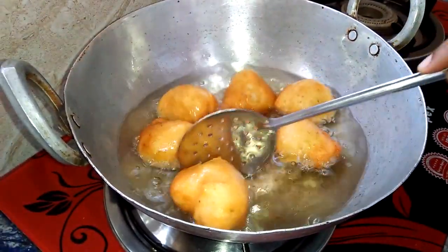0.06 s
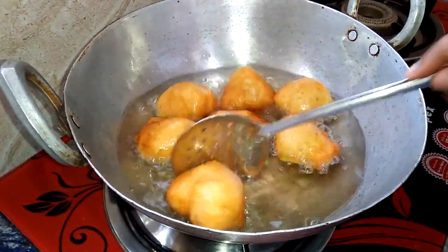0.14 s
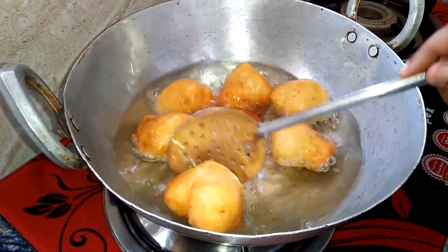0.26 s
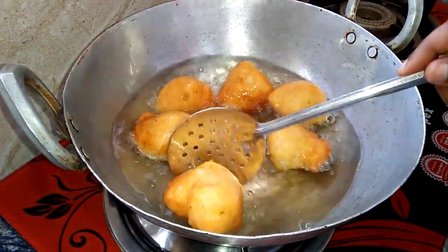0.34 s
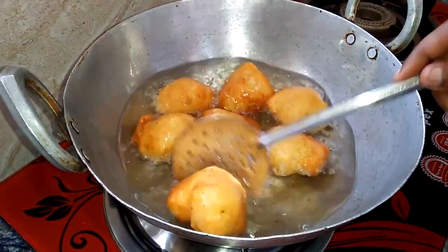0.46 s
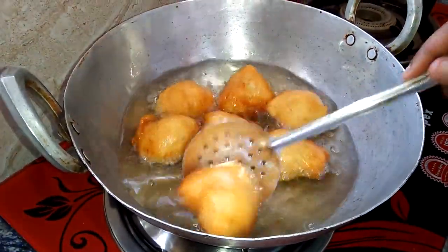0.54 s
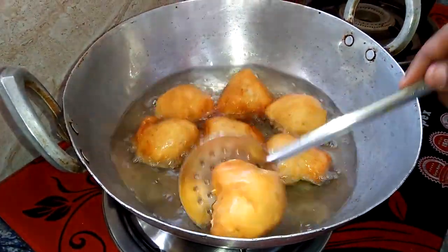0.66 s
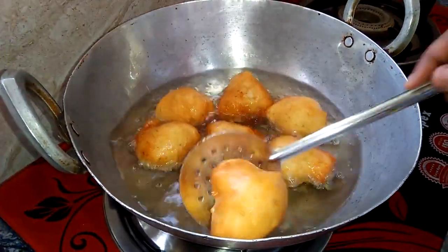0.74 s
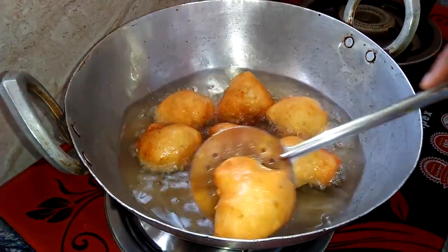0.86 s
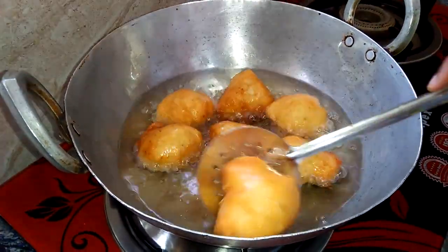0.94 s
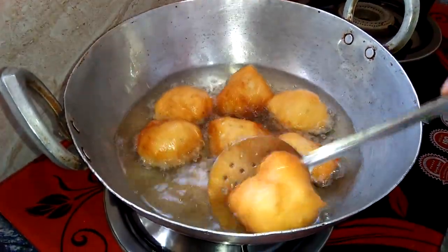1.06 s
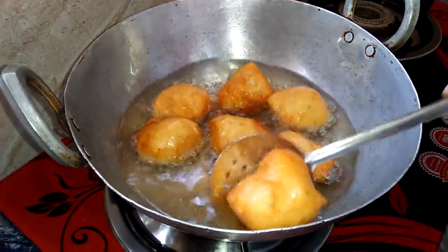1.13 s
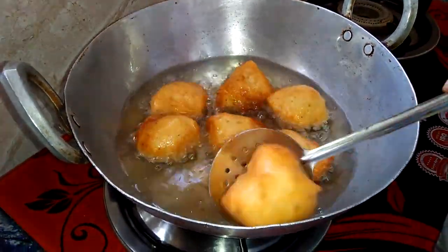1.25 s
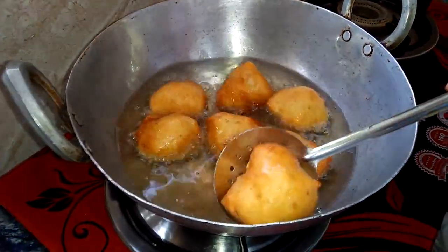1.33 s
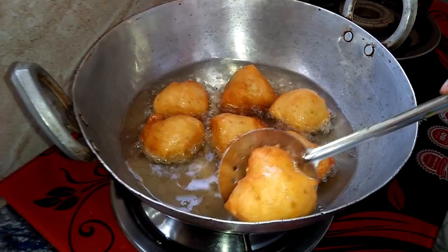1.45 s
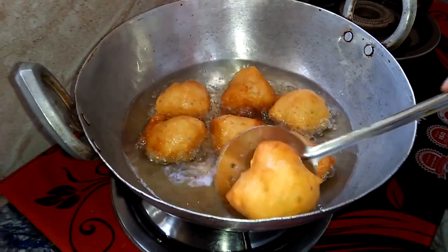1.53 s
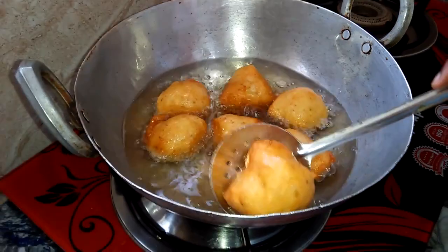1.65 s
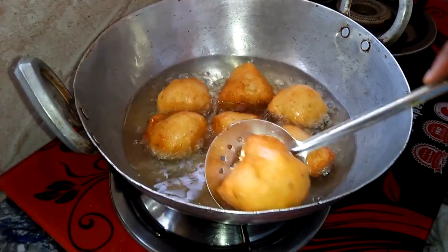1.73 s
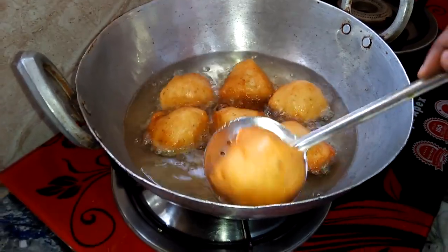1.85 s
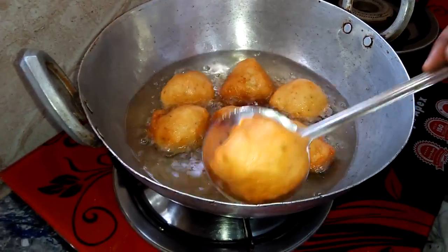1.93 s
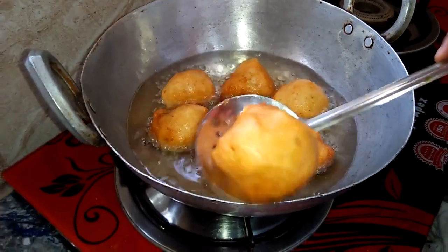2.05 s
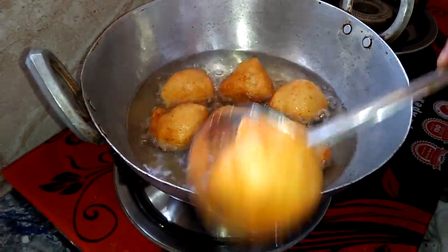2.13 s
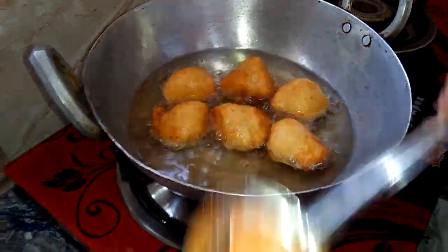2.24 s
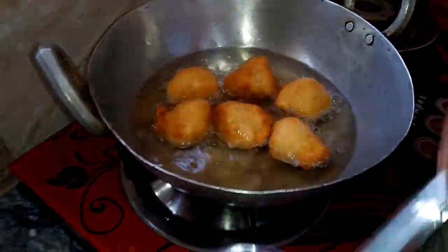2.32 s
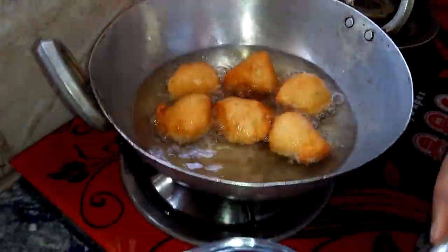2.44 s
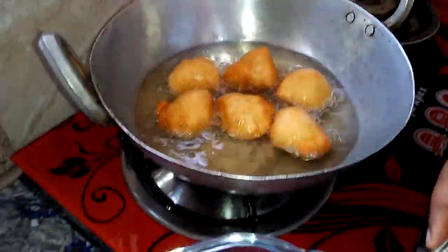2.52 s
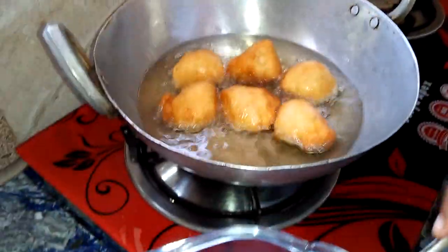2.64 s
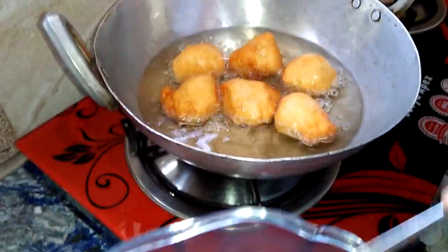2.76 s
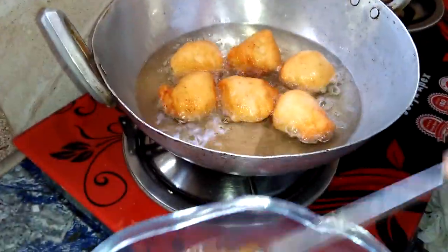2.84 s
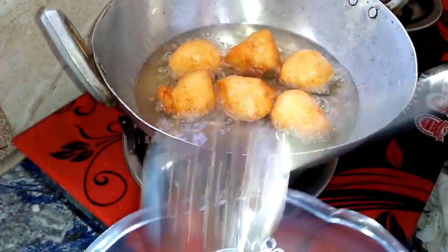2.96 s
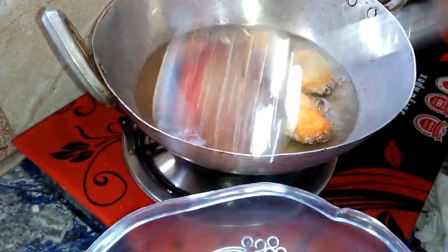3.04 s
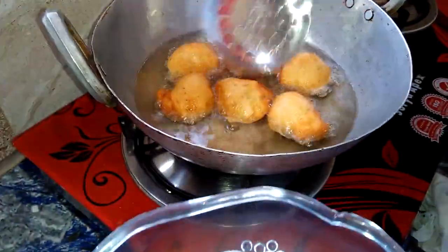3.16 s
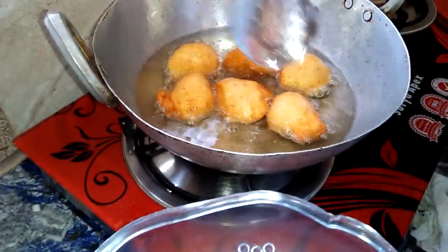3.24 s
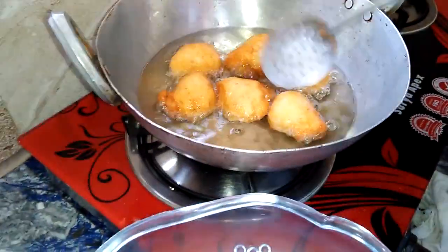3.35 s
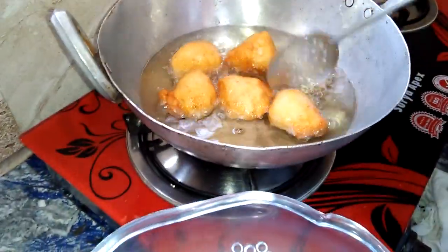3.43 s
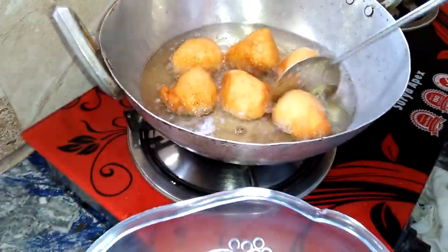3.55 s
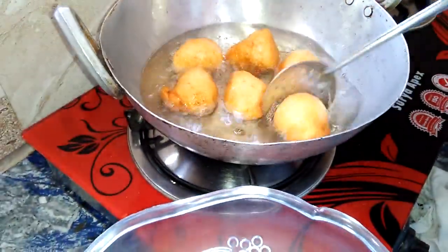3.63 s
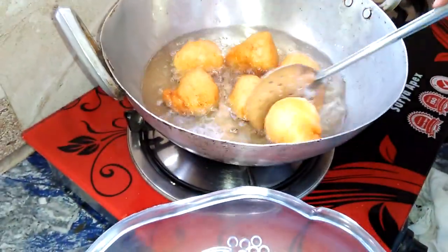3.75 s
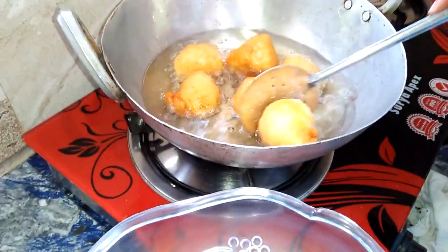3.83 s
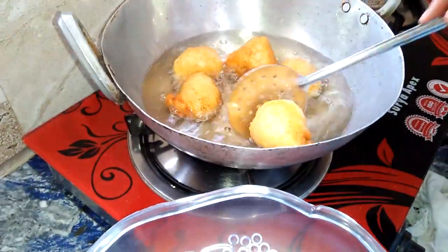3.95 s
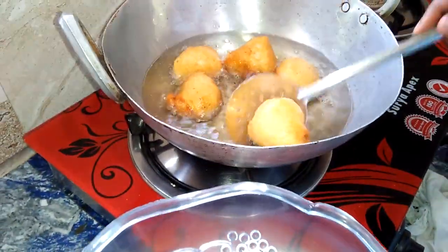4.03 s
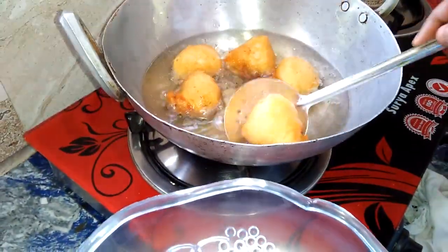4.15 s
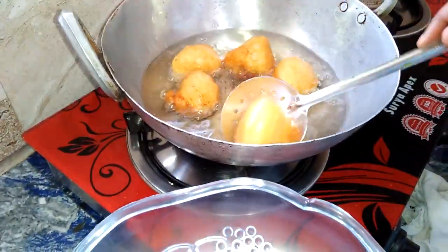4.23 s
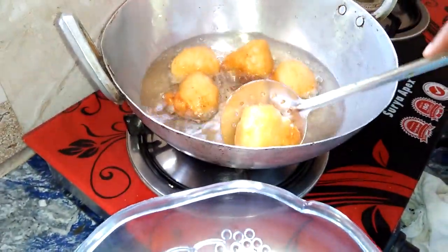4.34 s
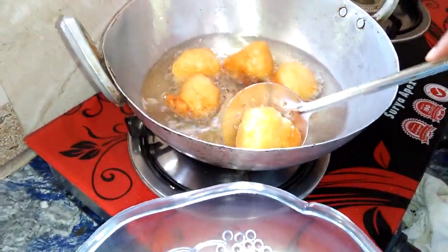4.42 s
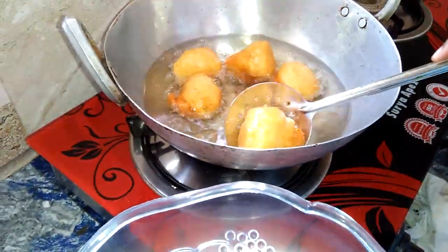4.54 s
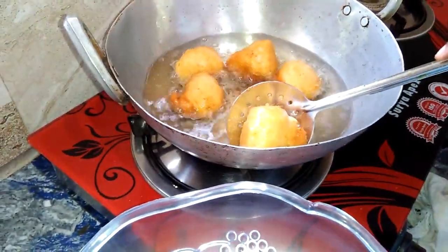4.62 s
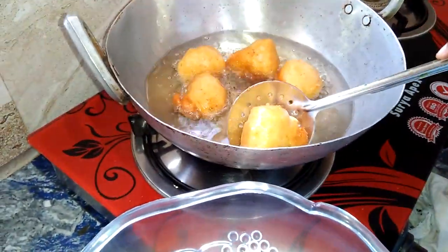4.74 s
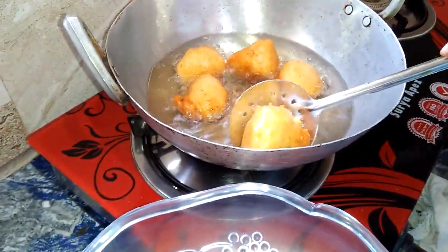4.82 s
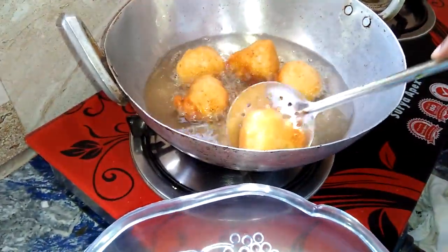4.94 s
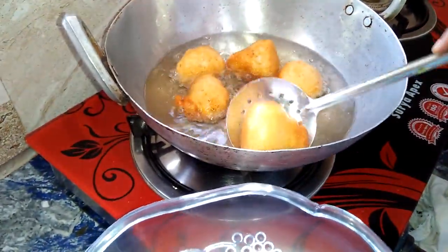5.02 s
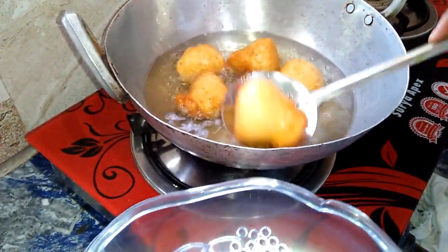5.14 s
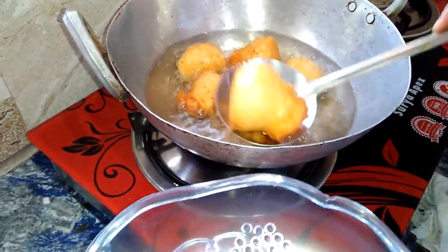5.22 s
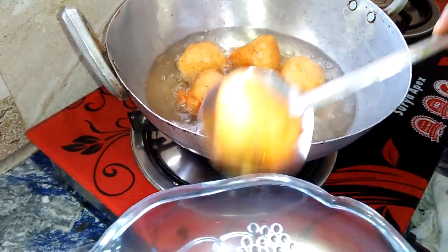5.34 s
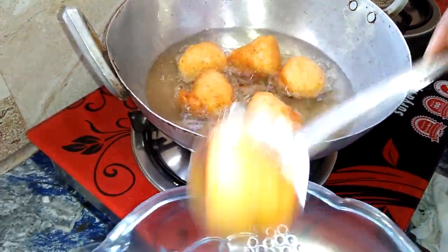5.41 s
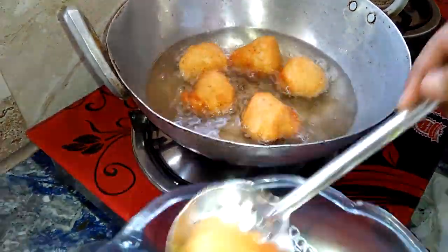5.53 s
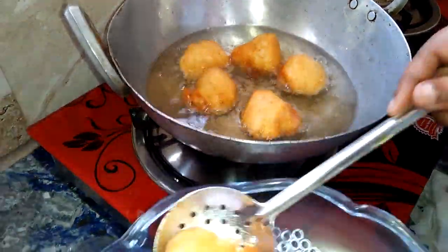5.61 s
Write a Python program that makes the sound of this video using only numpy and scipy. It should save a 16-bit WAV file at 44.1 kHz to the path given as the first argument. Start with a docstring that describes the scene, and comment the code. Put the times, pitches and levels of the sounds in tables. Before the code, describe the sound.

A metal skimmer knocks and scrapes in an oil-filled pan, thuds and clinks at a bowl, then knocks and scrapes again over faint fizz.

```python
"""Skimmer in an oil pan

A perforated steel skimmer knocks and scrapes in an oil-filled metal pan, tips fritters into a bowl
and clinks on its rim. Metal sounds are fading tones plus noise; a scrape is many tiny uneven slips.
A small hard kitchen answers with short noise tails. Under it all, oil fizzes faintly and bubbles
over a low wavering hum, a rumble and the room's murk."""
import sys
import numpy as np
from scipy import signal
from scipy.fft import rfft, irfft, next_fast_len
from scipy.io import wavfile
from scipy.ndimage import uniform_filter1d, map_coordinates

SR = 44100
rng = np.random.default_rng(int(sys.argv[2]) if len(sys.argv) > 2 else 0)


def output_pcm(signal):
    """Save a mono or channel-first signal as 16-bit PCM at the path in sys.argv[1].

    Samples are clipped to [-1, 1] before scaling.
    """
    pcm = np.clip(np.atleast_2d(signal).T, -1, 1) * 32767
    wavfile.write(sys.argv[1], SR, np.round(pcm).astype(np.int16))


N = 250488  # length in samples

# In the tables, "die-away" is the time to fade by 60 dB, and "width" is how broad a tone is.
# Hum: (time [s], level [dB])
HUM_LEVELS = [(0.0, -91), (0.43, -64.5), (0.66, -83), (1.06, -74), (1.11, -59), (1.36, -82), (1.5, -62.5),
              (1.96, -69.5), (2.15, -60.5), (2.45, -79), (2.72, -72), (2.89, -96), (2.94, -66),
              (3.78, -59.5), (3.86, -65.5), (4.16, -65.5), (4.43, -72), (4.82, -69), (4.84, -60),
              (4.9, -64), (5.27, -51.5), (5.49, -60), (5.57, -53.5), (5.68, -64)]
# Room and oil: (time [s], room murk level [dB], oil fizz level [dB])
AIR_LEVELS = [(0.0, -63.5, -68.5), (0.32, -72.5, -98.5), (0.6, -63, -68.5), (0.9, -62.5, -83),
              (1.5, -55, -58), (2.1, -64, -105), (2.4, -65, -74), (2.99, -67, -69.5), (3.3, -63, -74.5),
              (3.8, -61, -88), (3.97, -63.5, -105), (4.2, -52, -71), (4.54, -60.5, -105), (4.86, -61, -79),
              (5.1, -51, -53), (5.33, -56.5, -74), (5.68, -56, -85)]
# Colour of the room murk: (frequency [Hz], relative level [dB])
MURK_COLOUR = [(12, -11), (20, -16.5), (48, -6), (139, -10.5), (226, -21.5), (305, -8.5), (376, -4),
               (583, -6.5), (670, -6), (770, -5.5), (1770, -8), (2870, -18.5), (5000, -43.5), (6500, -52),
               (11000, -120)]
# Colour of the oil fizz, also used for the hiss of the thuds: (frequency [Hz], relative level [dB])
FIZZ_COLOUR = [(2000, -30), (3000, -5), (5200, -3), (7000, -4), (9500, 0), (11000, -2), (14000, 0)]
# Nudges of the skimmer's blade: (time [s], level [dB])
TAPS = [(0.093, -64.5), (0.2753, -66), (0.3471, -33), (0.45, -56)]
# Tones of the blade: (frequency [Hz], width [Hz], level [dB])
BLADE_TONES = [(290, 22, -12), (735, 16, -10), (1205, 16, -12), (1497, 24, 0), (1660, 30, -7),
               (1850, 40, -10), (2010, 35, -10), (2140, 40, -4), (2700, 60, -16)]
# Die-away of the kitchen's answer: (frequency [Hz], die-away [s])
KITCHEN_FADE = [(300, 0.49), (1400, 0.32), (10000, 0.34)]
# Knocks on the pan: (time [s], level at 1-1.5 kHz [dB], then relative to it: bass [dB],
# 1.5-3 kHz [dB], treble [dB]; contact noise die-away [s], favoured pitch [Hz], its boost [dB])
KNOCKS = [(0.2742, -68, 5, 15.5, -3, 0.56, 1930, 16), (0.397, -61, -9, 5, 1, .05, 3650, 25),
          (0.427, -59.5, -23, 1, 9, .25, 1480, 8.7), (0.6654, -62.5, 1.5, 1, 21, 0.22, 6660, 4),
          (0.7632, -56.5, -16, -1, -15, .075, 2010, 26), (0.7822, -69, 3, -16, 12.5, 0.32, 1640, 8.5),
          (1.053, -61.5, 5.5, -11, 8.5, 0.88, 1940, 7.7), (1.099, -18.5, -5, -6.5, -11, 0.21, 2330, 4.6),
          (1.2675, -22, -8, -15.5, -9, 0.13, 1240, 5.4), (1.3117, -40.5, 7, -21, 7, .094, 1810, 7.5),
          (1.4088, -26.5, -7, -18.5, -6, 0.1, 1227, 2.3), (1.5604, -23.5, -9.5, -7.5, -0.5, 0.1, 5730, 1.8),
          (1.932, -57.5, -10, -14, 15, .04, 9800, 17), (1.981, -30, -24, -2, 3.5, 0.25, 6100, 14),
          (2.4208, -80, -13.5, -.6, 9, .13, 1800, 7.5), (2.5383, -82, 2.5, 8, 21, 0.21, 1700, 6),
          (3.2498, -61, -16, -13, -24, 0.068, 1930, 7), (3.3834, -64, 14.5, 14.5, 1.5, .11, 1960, 16),
          (3.524, -52.5, 4.5, -9, -13, 0.12, 900, 6.5), (3.5502, -19, -10.5, -2, -9, 0.21, 1870, 6.1),
          (3.9424, -75.5, 21, 3, 11.5, 1, 2160, 6), (4.0247, -64, 8, -5, 11, 0.2, 1480, 7.5),
          (4.0336, -60.5, -18, -15, 17.5, .12, 6800, 7.4), (4.0981, -18, -5, -3, -9, 0.19, 2520, 3.4),
          (4.2464, -26, -1.5, -1, 0, 0.19, 1620, 0.77), (4.875, -30.5, -4, -15.5, -9, 0.2, 1800, 3.2),
          (5.5526, -58, -20, 13.5, 10.5, 0.34, 1620, 13), (5.6343, -60.5, -7, 18.5, 12, 0.4, 2040, 5.2)]
# Borders between the seven pitch zones: (frequency [Hz])
ZONE_BORDERS = [400, 1000, 1500, 2900, 5100, 9500]
# The pan's clear tones: (frequency [Hz], width [Hz], level [dB])
PAN_TONES = [(287.7, 36, -11), (474.4, 20, -10), (576, 12, -1), (643.9, 30, -2), (795, 12.3, -10.5),
             (869, 89, -13), (938.4, 35, -12), (1048, 22, -11), (1108, 18, -7), (1227, 16, 0),
             (1295, 22, -11), (1411, 22, -11), (1495, 25, -13), (1722, 15, -6), (1775, 9.6, -7.5),
             (2210, 130, -10), (2149, 22, -10.5), (2286, 53, -17), (2270, 13, -29), (2570, 86, -20),
             (3510, 11, -20), (3776, 33, -24.5), (4400, 46, -64), (4960, 290, -19.5), (5280, 27, -16),
             (5570, 32, -6), (6200, 20, -11.5), (6400, 56, -16), (7360, 46, -15.5)]
# The pan's crowd of small tones: (frequency [Hz], relative level [dB])
PAN_CROWD = [(88, -50), (150, -10.5), (371, -8), (466, -5.5), (522, -31), (574, -7.5), (973, -8.5),
             (1220, -16), (1370, -14.5), (2600, -11.5), (3140, -23), (5860, -25.5), (10700, -19.5),
             (13700, -21)]
# Sliding strokes: (start [s], rise [s], fall [s], level [dB], relative treble [dB],
# favoured pitch at start [Hz], at end [Hz])
SCRAPES = [(0.42, 0.029, 0.059, -55.5, 7.5, 1440, 2000), (1.278, 0.023, 0.052, -36, -5.5, 1220, 1150),
           (1.419, 0.026, 0.11, -37.5, -5, 1160, 850), (1.578, 0.0083, 0.11, -34, -7.5, 1190, 690),
           (1.679, 0.02, 0.094, -37, -6.5, 1200, 1080), (1.709, 0.04, 0.066, -45.5, -19, 734, 870),
           (1.808, 0.072, 0.08, -33.5, -4, 1120, 1300), (1.988, 0.0093, 0.085, -35, 0, 1696, 2170),
           (4.04, 0.05, 0.016, -49, -9.5, 1100, 1100), (4.259, 0.023, 0.12, -39, -18, 1120, 1100),
           (4.91, 0.044, 0.078, -43.5, -14, 980, 1200), (4.988, 0.084, 0.083, -41.5, 0.5, 660, 1120),
           (5.021, .15, .13, -32, -12, 1150, 1180), (5.08, .14, 0.082, -36, -1.5, 1570, 2134),
           (5.331, 0.089, 0.12, -62, -8, 950, 1050), (5.5, 0.11, .14, -80, 11, 460, 640),
           (5.56, 0.028, 0.1, -62, -3, 1640, 2460)]
# Zone levels of a stroke that favours 1.2 kHz, 1-1.5 kHz zone first: (level [dB])
SLIDE_ZONES = [-12, -35, -14.16, -17, -32, -8.27, -13.5]
# Their change as the favoured pitch rises: (change per octave [dB])
SPEED_ZONES = [4, -11.5, -13.5, 15, 43, -7.8, -7]
# Thuds in the bowl: (time [s], level [dB], bass [dB], treble hiss [dB], rise [s], die-away [s])
THUDS = [(2.6114, -41.5, 7.5, -24, 0.0077, 0.066), (2.6192, -22, 0, -27, 0.0038, 0.049),
         (2.664, -16, -3.5, -46, 0.013, 0.047), (2.6834, -19, -5, -51, 0.0071, 0.018),
         (2.7235, -34.5, -3, -37, 0.0033, 0.12), (2.734, -17, -15, -27, 0.019, 0.051),
         (2.745, -13, -20, -12, 0.0084, 0.026), (2.7567, -19, -34, -13, 0.0061, 0.027)]
# Tones of the bowl: (frequency [Hz], width [Hz], level [dB])
BOWL_TONES = [(594, 29.5, 6.5), (1216, 25.3, 6.5), (1465, 15.7, 4.5), (1560, 11, -9), (1645, 32, -2.5),
              (2180, 80, -5), (2500, 22, -13), (2610, 20, -8), (2984, 24, -7.5)]
# Small steel contacts on the rim: (time [s], level [dB], knock [dB], ring [dB])
CLINKS = [(2.8685, -26.5, 0, 0.5), (2.9088, -31.5, 3.5, 9), (2.9611, -44.5, 8, 3.5), (3.017, -58.5, 11, 11),
          (5.5533, -32, -8.5, -12), (5.6366, -36, -1, 1)]
# Ringing tones of the rim: (frequency [Hz], level [dB], die-away [s])
RIM_TONES = [(5860, -15, .08), (7682, -12, .08), (9862, -11, .09), (10150, -14, .07), (11000, -11, .05),
             (12600, -8, .09), (13370, -4, .11), (13560, -6, .08)]
# Difference between the two sides: (frequency [Hz], side level relative to middle [dB])
SIDE_LEVELS = [(60, -56), (1500, -78), (3500, -66), (5500, -45), (8000, -4.5), (14000, -10.5)]
# Top-end roll-off: (frequency [Hz], gain [dB])
TOP_ROLL_OFF = [(9000, 0), (11000, -2), (12500, 0), (14200, 1), (14450, -36), (15600, -55)]
# Cancellations at the microphone port: (frequency [Hz], half width [Hz], gain [dB])
PORT_DIPS = [(378, 30, -11), (2950, 150, -8), (5100, 250, -7)]

TOP_HZ = 15617  # band limit
# Knocks: below 400 Hz relative to bass; 3-5 kHz relative to its neighbours' mean; top relative to treble
KNOCK_THUMP_DB, KNOCK_GAP_DB, KNOCK_TOP_DB = -21.5, -8.5, -5.5
RISE_DB, FALL_DB = 21.5, 36  # how far under its peak a stroke starts and ends
# Murk and fizz swell with the metal's loudness: averaging time of its power, and the two gains
STIR_S, STIR_MURK_DB, STIR_FIZZ_DB = 0.053, -23.5, -35


def amp(db):
    """Turns decibels into a gain."""
    return 10 ** (np.asarray(db) / 20)


def unit(x):
    """Scales a sound to an average (rms) strength of 1 along time."""
    return x / np.sqrt(np.mean(x ** 2, axis=-1, keepdims=True) + 1e-20)


def along(points, hz):
    """Reads a curve of (Hz, value) points, with pitch on a log axis."""
    f, v = np.transpose(points)
    return np.interp(np.log(hz + 1), np.log(f + 1), v)


def curves(rows):
    """Draws one value per sample for each column after the time."""
    s, *columns = np.transpose(rows)
    return np.array([np.interp(np.arange(N) / SR, s, column) for column in columns])


def wobble(rate):
    """A smooth random curve with `rate` random points a second."""
    knots = rng.standard_normal(int(N * rate / SR) + 4)
    return map_coordinates(knots, [np.arange(N) * rate / SR])


def filtered(x, response):
    """Reshapes each frequency of x by a gain, which may also shift its phase."""
    n = x.shape[-1]
    m = next_fast_len(n + 8192)  # spare room lets the filter ring out
    return irfft(rfft(x, m) * response(np.fft.rfftfreq(m, 1 / SR)), m)[..., :n]


def noise(spectrum, n):
    """Coloured noise with an average (rms) strength of 1."""
    return unit(filtered(rng.standard_normal(n), lambda hz: amp(along(spectrum, hz))))


def add(track, s, sound):
    """Mixes a sound into the track at s seconds."""
    track[round(s * SR):][:len(sound)] += sound


def resonances(modes):
    """A filter that rings at each (Hz, width, dB) tone, with alternating sign."""
    def response(f):
        total = 0
        for k, (centre, width, db) in enumerate(modes):
            loss = 1j * f * width
            total = total + (-1) ** k * amp(db) * loss / (centre * centre - f * f + loss)
        return total
    return response


def ring(modes, t, scatter_db):
    """A blow sets off every (Hz, width, dB) tone at a new strength; broad tones fade faster."""
    hz, width, db = np.transpose(modes)[:, :, None]
    strength = amp(db + scatter_db * rng.standard_normal(hz.shape))
    return np.sum(strength * np.exp(-np.pi * width * t) * np.sin(2 * np.pi * hz * t), axis=0)


def zones(hz):
    """Splits pitch into seven soft-edged zones, the 1-1.5 kHz zone first."""
    edges = [1 / (1 + (edge / (hz + 1)) ** 10) for edge in ZONE_BORDERS]
    above = [1 + 0 * hz] + edges + [0 * hz]
    return -np.diff(above, axis=0)[[2, 0, 1, 3, 4, 5, 6]]


def favoured(hz, centre_hz, boost_db, width=0.17):
    """Boosts the pitch that the place or speed of contact picks out."""
    distance = np.log((hz + 1) / centre_hz) / width
    return amp(boost_db * np.exp(-.5 * distance ** 2))


def patchy(x, depth_db, size):
    """Makes random patches louder or softer; size = (frequency bins, time frames)."""
    z = signal.stft(x, nperseg=1024)[2]
    field = uniform_filter1d(rng.standard_normal(z.shape), size[0], 0)
    field = uniform_filter1d(field, size[1], 1)
    return signal.istft(z * amp(depth_db * field / np.std(field)), nperseg=1024)[1][:N]


def low_hum(hum_db):
    """Noise through three low resonances makes a fuzzy hum that throbs at about 27 Hz."""
    hum = filtered(rng.standard_normal(N), resonances([(111.2, 10.6, -5.5), (135.9, 6.4, 2.0), (173, 49, -15)]))
    throb = 1 + 0.16 * np.cos(2 * np.pi * 27.0 * np.arange(N) / SR + 2.2 * wobble(1.43))
    return amp(hum_db) * unit(hum * throb)


def low_rumble(hum_db):
    """Deep noise wavers slowly and partly follows the hum's level."""
    level = amp(-46.5 + 0.42 * hum_db + 3.6 * wobble(2.7))
    return level * noise([(15, -9), (30, -15), (55, 1.0), (90, 1), (130, -30)], N)


def room_murk(murk_db, stirred):
    """Dull room noise swells with the metal; its narrow bands waver slightly at random."""
    level = (amp(murk_db) + amp(STIR_MURK_DB) * stirred) * amp(2.3 * wobble(36) - 6.5)
    return level * patchy(noise(MURK_COLOUR, N), depth_db=1, size=(2, 14))


def oil_fizz(fizz_db, stirred):
    """Fine bright noise flickers and swells with the metal's loudness."""
    level = (amp(fizz_db) + amp(STIR_FIZZ_DB) * stirred) * amp(1.1 * wobble(19) + 2.5 * wobble(240))
    return level * patchy(noise(FIZZ_COLOUR, N), depth_db=-0.3, size=(40, 4))


def bubbles(count=240):
    """Small bubbles burst in the oil: short fading blips that rise in pitch."""
    out, t = np.zeros(N + SR), np.arange(SR // 20) / SR
    for when, pitch, size in rng.random((count, 3)):
        hz = 650 * 4 ** pitch
        fade = np.exp(-t * hz / 14) * (1 - np.exp(-t / 0.0038))
        blip = np.sin(2 * np.pi * hz * t * (1 + .8 * t)) * fade
        add(out, when * N / SR, amp(-3.5 * np.log(1 - size + 0.04)) * blip)  # loud ones are rare
    return out[:N]


def background(metal):
    """Hum, rumble, bubbles, murk and fizz; murk and fizz follow the metal's smoothed loudness."""
    murk_db, fizz_db = curves(AIR_LEVELS)
    keep = np.exp(-1 / (STIR_S * SR))
    stirred = np.sqrt(np.abs(signal.lfilter([1 - keep], [1, -keep], metal ** 2)))
    hum_db = curves(HUM_LEVELS)[0] + 1.2 * wobble(8.1)
    oil = amp(murk_db - 0.5) * bubbles() + oil_fizz(fizz_db, stirred)
    return low_hum(hum_db) + oil + room_murk(murk_db, stirred) + low_rumble(hum_db)


def taps():
    """Light nudges ring the blade's few separate tones, which chatter a little."""
    out, t = np.zeros(N + SR), np.arange(SR // 3) / SR
    for s, db in TAPS:
        broad_tones = resonances(np.multiply(BLADE_TONES, [1, 2.5, 1]))
        chatter = unit(filtered(rng.standard_normal(len(t)), broad_tones)) * amp(-60 * t / 0.32)
        blade = ring(BLADE_TONES, t, scatter_db=5.0) + 0.31 * chatter
        add(out, s, amp(db) * blade * (1 - np.exp(-t / 0.0036)))
    return out[:N]


def kitchen(x):
    """Hard walls answer: each short block gets its own random tail of fading noise."""
    out, step = np.zeros(N + SR), 6000  # samples per block
    for start in range(0, N, step):
        hz, t, z = signal.stft(rng.standard_normal(SR // 2), SR, nperseg=256)
        fade = amp(-60 * t / along(KITCHEN_FADE, hz)[:, None])
        tail = signal.istft(z * fade, SR, nperseg=256)[1]
        answer = signal.fftconvolve(x[start:start + step], tail / np.linalg.norm(tail))
        add(out, start / SR + .006, answer)
    return out[:N]


def knocks():
    """Each knock rings the pan's clear and crowded tones; place and hardness set the zone levels."""
    out, t = np.zeros(N + SR), np.arange(SR // 3) / SR
    # rise time [s] of each zone, slowest below 400 Hz
    rise = np.array([0.00038, 0.011, 0.002, 0.00051, 0.0025, 0.00061, 0.00009])[:, None]
    for s, db, bass_db, upper_db, treble_db, t60, centre_hz, boost_db in KNOCKS:
        crowd = noise(PAN_CROWD, len(t)) * (amp(-60 * t / t60) + 2.0 * amp(-60 * t / 0.0069))
        crack = 0.3 * amp(-60 * t / 0.002) * rng.standard_normal(len(t))
        clear = .42 * ring(PAN_TONES, t, scatter_db=3)
        blow = clear + 0.68 * crowd + crack
        parts = filtered(blow, lambda hz: zones(hz) * favoured(hz, centre_hz, boost_db))
        parts = parts * (1 - np.exp(-t / rise))
        early = np.sqrt(np.mean(parts[:, :300] ** 2, axis=1))  # strength of the first 300 samples
        gap_db = (upper_db + treble_db) / 2 + KNOCK_GAP_DB
        zone_db = [0, bass_db + KNOCK_THUMP_DB, bass_db, upper_db, gap_db, treble_db, treble_db + KNOCK_TOP_DB]
        add(out, s, amp(db - 10.5 + np.array(zone_db)) / early @ parts)
    return out[:N]


def sliding_metal():
    """Tiny uneven slips excite the pan: clear tones rule the low end, grit the top."""
    slips = rng.standard_normal(N) * amp(0.8 * wobble(70) + 0.8 * wobble(300))
    tilt = [(1000, -25), (2500, -23), (4000, -14), (6000, -1)]
    crowd = filtered(slips, lambda hz: amp(along(PAN_CROWD, hz)))
    grit = filtered(slips, lambda hz: amp(along(PAN_CROWD, hz) + along(tilt, hz)))
    metal = unit(filtered(slips, resonances(PAN_TONES))) + 2.02 * grit / np.std(crowd)
    return patchy(metal, depth_db=5.0, size=(20, 3))


def scrapes():
    """The sliding edge catches in tiny slips; a faster stroke picks out higher tones."""
    hz, t, z = signal.stft(unit(filtered(sliding_metal(), zones)), SR, nperseg=256)
    out = np.zeros_like(z[0])
    for s, rise, fall, db, treble_db, from_hz, to_hz in SCRAPES:
        times = s + np.cumsum([-.006, .006, rise, fall, .02])
        drop_db = np.interp(t, times, np.sqrt([80, RISE_DB, 0, FALL_DB, 80])) ** 2  # a rounded swell
        pitch = np.interp(t, times[[1, 3]], [from_hz, to_hz])
        slide_db = np.add(SLIDE_ZONES, treble_db * (np.arange(7) > 4))[:, None]
        zone_db = slide_db + np.outer(SPEED_ZONES, np.log2(pitch / 1200))
        now = slice(*np.searchsorted(t, times[[0, -1]]))
        gain = amp(db - drop_db + zone_db)[:, now]
        stroke = np.einsum("kt,kft->ft", gain, z[..., now])  # adds up the seven zones
        out[:, now] += stroke * favoured(hz[:, None], pitch[now], boost_db=8, width=.13)
    return signal.istft(out, SR, nperseg=256)[1][:N]


def bowl_thuds():
    """Soft dull thuds in the bowl: its tones, a noisy rattle around them and a short hiss."""
    out, t = np.zeros(N + SR), np.arange(SR // 3) / SR
    for s, db, bass_db, treble_db, rise, t60 in THUDS:
        modes = [(hz, width, level + bass_db * (hz < 900)) for hz, width, level in BOWL_TONES]
        broad_tones = resonances(np.multiply(modes, [1, 3.5, 1]))
        rattle = filtered(rng.standard_normal(len(t)), broad_tones)
        body = (1.1 * ring(modes, t, scatter_db=5.5) + 8.75 * rattle) * amp(-60 * t / t60)
        hiss = amp(treble_db - 14.5 - 60 * t / 0.081) * noise(FIZZ_COLOUR, len(t))
        add(out, s, amp(db - 2.5) * (body + hiss) * (1 - np.exp(-t / rise)))
    return out[:N]


def rim_clinks():
    """Bright steel contacts on the rim: high fading tones, a noise tick and a lower knock."""
    out, t = np.zeros(N + SR), np.arange(SR // 3) / SR
    knock_colour = [(150, -60), (300, -30), (470, 1), (900, -4), (2500, -5), (4000, -14), (5000, -70)]
    for s, db, knock_db, ring_db in CLINKS:
        steel = 0
        for hz, level, t60 in RIM_TONES:
            strength = amp(level + rng.normal(0, 3) - 60 * t / t60)  # 3 dB of random scatter
            steel = steel + strength * np.sin(2 * np.pi * hz * t)
        tick = rng.standard_normal(len(t)) * (0.71 * amp(-60 * t / 0.011) + 0.16 * amp(-60 * t / 0.068))
        knock = noise(knock_colour, len(t)) * amp(knock_db - 60 * t / 0.1)
        add(out, s, amp(db - 14.5) * (amp(ring_db) * steel + tick + knock))
    return out[:N]


def scene():
    """Two close microphone ports agree except in the treble, where scattered sound differs."""
    metal = taps() + knocks() + scrapes() + bowl_thuds() + rim_clinks()
    mid = metal + amp(-11) * kitchen(metal) + background(metal)
    z = signal.stft(mid, nperseg=256)[2]
    random_turns = np.exp(2j * np.pi * rng.random(z.shape))  # a random phase for each bin and frame
    scattered = signal.istft(z * random_turns, nperseg=256)[1][:N]
    side = filtered(scattered, lambda hz: amp(along(SIDE_LEVELS, hz)))
    return np.array([mid + side, mid - side])


def record(dry):
    """The port colours the sound, the top falls away, and nothing is kept above the band limit."""
    def response(hz):
        dips_db = sum(db / (1 + ((hz - centre) / width) ** 2) for centre, width, db in PORT_DIPS)
        return amp(along(TOP_ROLL_OFF, hz) + dips_db) * (hz < TOP_HZ)
    return filtered(dry, response)


dry = scene()
out = record(dry)
output_pcm(out)
```